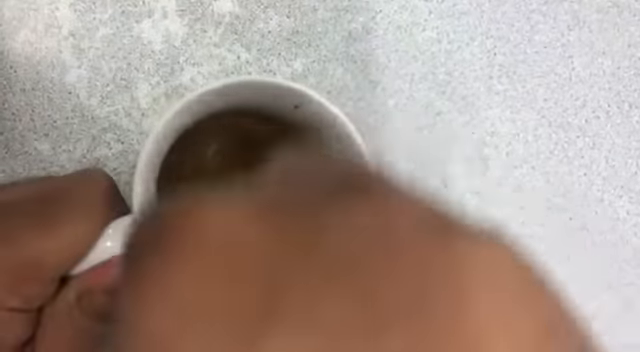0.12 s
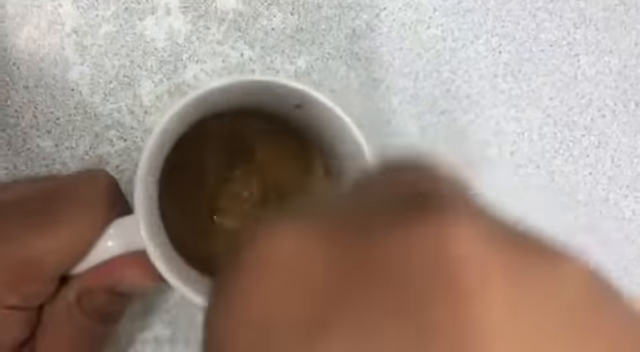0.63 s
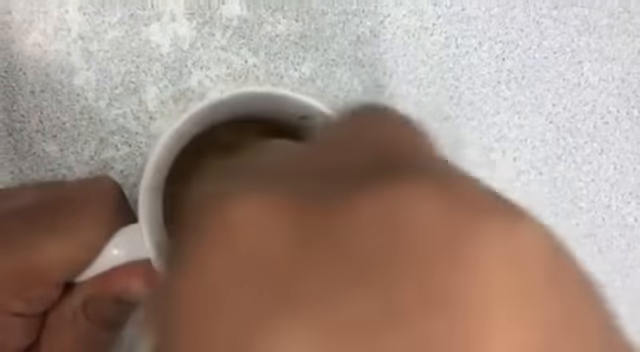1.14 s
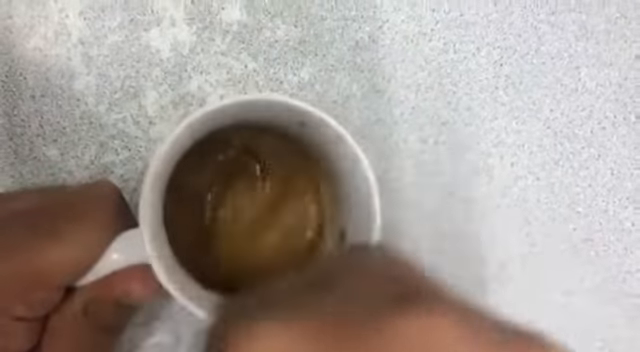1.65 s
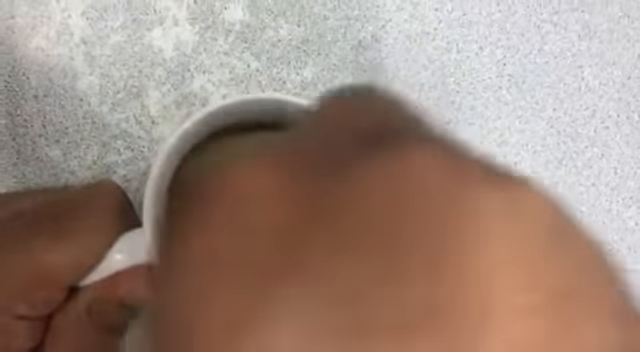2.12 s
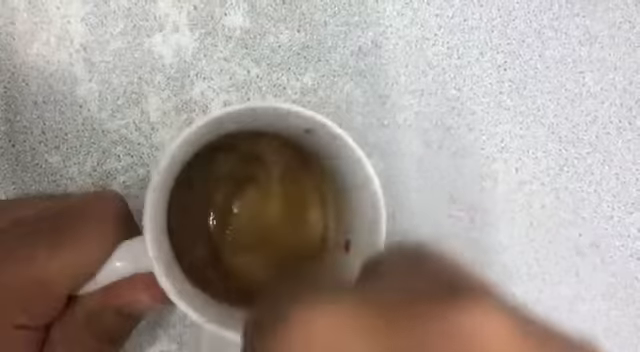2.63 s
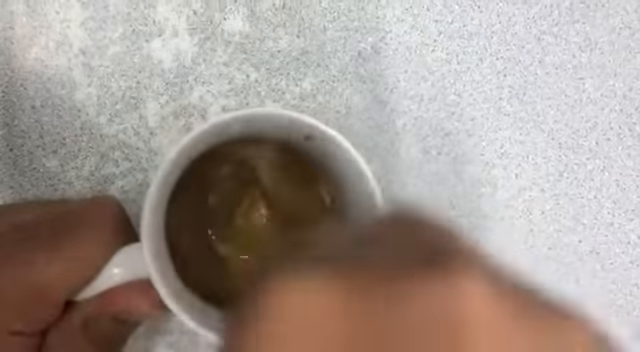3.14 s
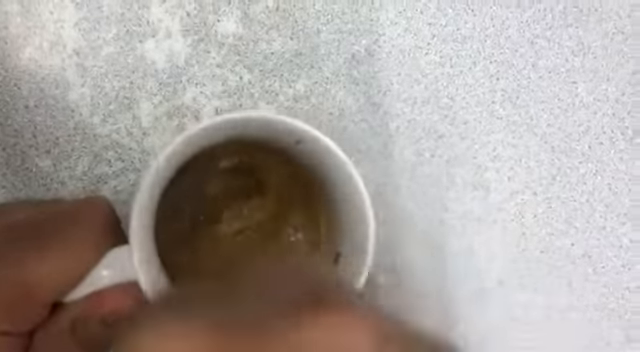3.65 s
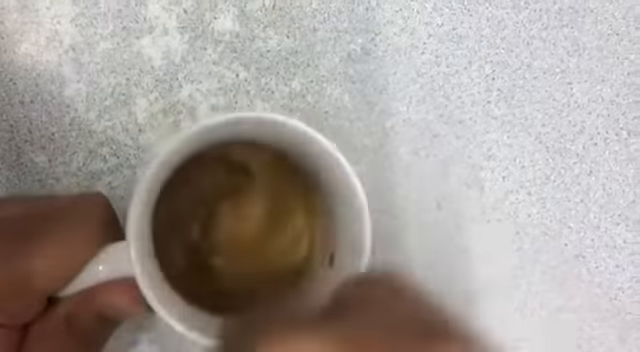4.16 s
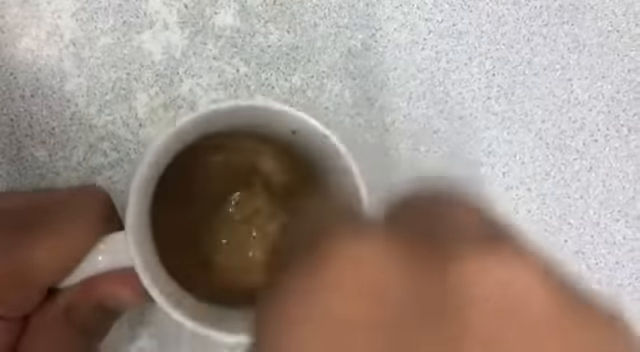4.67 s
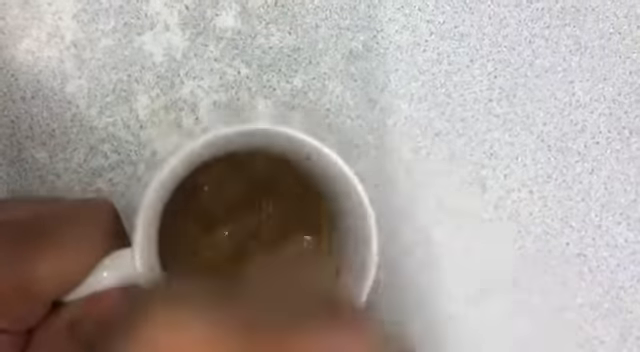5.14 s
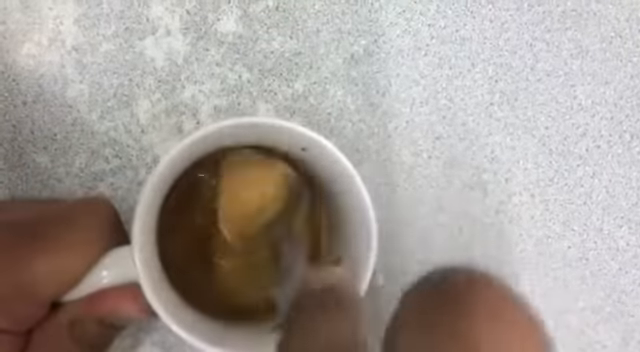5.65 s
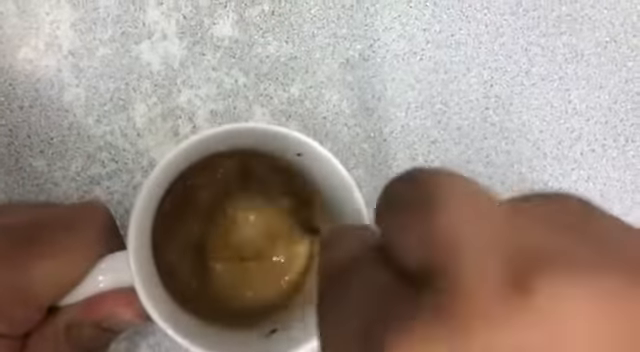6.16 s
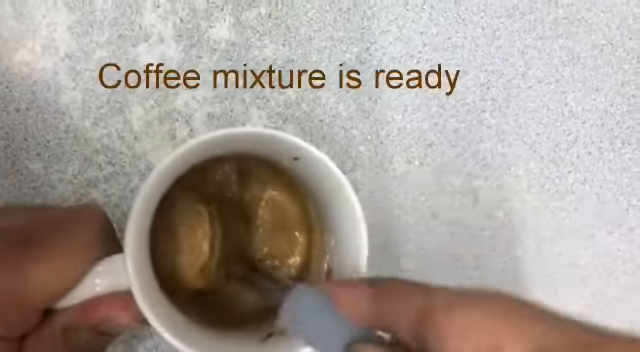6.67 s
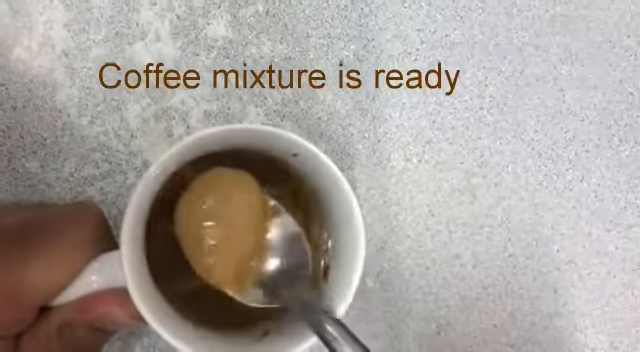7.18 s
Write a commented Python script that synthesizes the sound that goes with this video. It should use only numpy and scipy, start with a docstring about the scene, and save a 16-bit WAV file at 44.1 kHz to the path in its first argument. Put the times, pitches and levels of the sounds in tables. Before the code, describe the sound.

Close, rapid spoon stirring in a ceramic mug, hollow knocks, bright clinks and gritty wet scraping, ending in a pause and a few light touches.

```python
"""Kitchen counter, close by: a steel spoon beats thick coffee paste in a ceramic mug held down by hand.
Knocks ring damped modes of mug and spoon; the air column booms near 850 Hz. Random grains ring the same
modes as the spoon drags through paste, scrapes the wall and grates sugar. The beating stops, then the spoon
gathers the paste with a few light touches and slips. The walls answer over counter rumble and hiss."""
import sys
import numpy as np
from scipy import signal
from scipy.fft import rfft, irfft, next_fast_len
from scipy.io import wavfile
from scipy.ndimage import map_coordinates

SR = 44100
rng = np.random.default_rng(int(sys.argv[2]) if len(sys.argv) > 2 else 0)


def generate_wav(signal):
    """Clip the signal to [-1, 1] and save it as 16-bit WAV at the path in sys.argv[1]."""
    frames = np.transpose(np.atleast_2d(signal))
    scaled = np.clip(frames, -1, 1) * 32767
    pcm = np.round(scaled).astype(np.int16)
    wavfile.write(sys.argv[1], SR, pcm)


def how_loud(loudness_db):
    """Turn decibels into a plain amplitude multiplier (0 dB gives 1, 20 dB gives 10)."""
    steps = np.asarray(loudness_db, float) / 20
    return 10 ** steps


N = 321924

# spoon contacts: (time [s], boom of the air column [dB], clink of the wall [dB],
# edge [dB] that the top modes gain and the low wall modes lose, pitch of the mode that the spot rings most [Hz])
CONTACTS = [(0.0369, -40, -47.5, 2.5, 2990), (0.057, -44, -75, 2, 2900), (0.0645, -32.5, -40.5, -1, 4840),
            (0.116, -60.5, -44, 4, 6130), (0.135, -51, -56, 11.5, 2900), (0.1599, -34.5, -41, -1.5, 4280),
            (0.2483, -55.5, -54.5, -3, 2890), (0.2677, -53, -58.5, 0.5, 2900),
            (0.2862, -64.5, -56, -10, 2940), (0.3627, -36.5, -45.5, -3, 6210), (0.379, -44, -68.5, 6, 2900),
            (0.398, -39.5, -53.5, -1, 3450), (0.439, -43, -54.5, -1, 4200),
            (0.4765, -45.5, -49.5, 7.5, 6560), (0.481, -37.5, -39, -2, 6470),
            (0.5005, -43.5, -59.5, 7.5, 5720), (0.5553, -75, -53.5, 1, 2900), (0.669, -42, -47.5, 3, 4880),
            (0.756, -48.5, -49.5, -1, 4000), (0.798, -50, -59, 6.5, 8280), (0.8918, -49, -57.5, -9.5, 2700),
            (0.909, -39, -48, 1.5, 4120), (1.0144, -40.5, -45, -1.5, 4750), (1.0742, -52, -46, -2, 4250),
            (1.141, -48.5, -54.5, -3, 3680), (1.2386, -63, -46.5, -8.5, 2920),
            (1.3069, -39.5, -44, 4, 6290), (1.395, -47.5, -47, -3.5, 3120), (1.405, -38, -47.5, -5, 4500),
            (1.4531, -51.5, -55, -2.5, 7000), (1.628, -42.5, -44.5, 3.5, 9740),
            (1.653, -41.5, -51, 3.5, 7120), (1.7202, -35.5, -56.5, 2, 3100),
            (1.7374, -41.5, -40, 3.5, 4200), (1.9368, -37.5, -44.5, 3.5, 9650),
            (1.945, -52.5, -57, -5, 5100), (2.0541, -48, -57, 4, 10660), (2.0872, -52.5, -51.5, -3.5, 4530),
            (2.1638, -45.5, -54.5, -1, 2950), (2.1969, -74.5, -35, 2, 2960),
            (2.2655, -44.5, -53, -0.5, 2960), (2.28, -41, -60, 1, 4900), (2.3582, -53, -52, -3.5, 10700),
            (2.3635, -37.5, -52.5, -2, 4210), (2.4227, -40.5, -46.5, -1, 6500),
            (2.5091, -65, -58.5, -10, 2910), (2.5956, -49, -58.5, -0.5, 3010), (2.607, -41.5, -61, 0, 6240),
            (2.753, -50, -48, -2.5, 3430), (2.77, -41, -46, -5, 6550), (2.8168, -73, -48.5, -1.5, 4130),
            (2.9298, -37.5, -45, -1.5, 3020), (2.945, -47, -61.5, 11.5, 11050),
            (3.001, -50, -59.5, 7.5, 3100), (3.0341, -46, -60, -13.5, 4500), (3.1658, -76, -44, -1.5, 2900),
            (3.2417, -40, -45, 2, 10170), (3.316, -55, -55, -1, 6550), (3.322, -42.5, -54.5, -2.5, 3100),
            (3.3418, -46.5, -55.5, 4.5, 10140), (3.4086, -57, -57.5, -3, 2680),
            (3.467, -56.5, -37.5, 1.5, 2760), (3.534, -37.5, -48.5, -2.5, 2950),
            (3.543, -36, -65, 5.5, 330), (3.5714, -53.5, -54.5, 13, 6900), (3.6361, -48, -37, -0.5, 3120),
            (3.6991, -45.5, -61.5, -9, 2880), (3.8579, -39.5, -56.5, -3.5, 6210),
            (3.9255, -44, -52, -2, 4600), (3.9598, -44, -70, -9, 9440), (3.9701, -39.5, -42.5, 7.5, 10590),
            (3.9758, -35.5, -34, 0, 6540), (4.0733, -48.5, -48, -1.5, 3890), (4.1714, -37, -40, 5.5, 6820),
            (4.2773, -38, -51, -0.5, 3390), (4.291, -37, -48, -11.5, 4030),
            (4.3887, -65.5, -49.5, -4, 4130), (4.472, -43.5, -47.5, 1.5, 3660),
            (4.4968, -42, -65.5, 6.5, 9100), (4.575, -42.5, -66.5, -3.5, 2540),
            (4.5843, -53, -54.5, -9.5, 2900), (4.6031, -34, -36.5, 5.5, 6150),
            (4.671, -45.5, -64.5, -11, 2800), (4.6909, -77, -36.5, 0.5, 11440),
            (4.774, -40, -40.5, 2.5, 9040), (4.87, -44, -51, 0, 3040), (4.9238, -44.5, -39.5, 0.5, 6460),
            (5.087, -45, -52, 0.5, 2970), (5.109, -46, -56.5, 0, 6930), (5.1463, -35.5, -43.5, -0.5, 4700),
            (5.1902, -40, -45, -0.5, 7900), (5.2485, -41, -52, -3, 3420),
            (5.3225, -69.5, -48.5, -7.5, 2950), (6.0396, -58, -75, -1, 10200),
            (6.064, -48, -64.5, -6, 3000), (6.1754, -57.5, -60.5, -6, 2485),
            (6.256, -45, -63.5, -3.5, 2520), (6.2695, -52, -76.5, -17.5, 2340), (6.308, -54, -66, 7, 2800),
            (6.3196, -47, -61, -4, 4090), (6.8449, -58, -69, 0, 3100)]
# modes of mug and spoon, before each contact's own colour and damping: (pitch [Hz], level [dB], t60 [s])
MODES = [(296.3, -4, 0.029), (551, -9, 0.035), (840, 0, 0.1), (891.4, 8, 0.03), (1094, 1.5, 0.029),
         (1372, 0, 0.032), (1770, -23, 0.011), (2714, -6, 0.021), (3048, -5, 0.027), (3453, -8, 0.023),
         (4250, -6, 0.012), (5920, -12.5, 0.016), (6240, -11, 0.029), (8340, -8.5, 0.016), (9520, -9, 0.02),
         (10560, -10.5, 0.036)]
# borders of the four families of modes, air column, low wall, middle and top: [Hz]
BORDERS_HZ = [250, 1600, 3800, 7500, 13000]


def unit(x):
    """Scaled to rms 1."""
    return x / np.sqrt(np.mean(x ** 2) + 1e-20)


def along(points, hz):
    """Reads (Hz, value) points on a log frequency axis."""
    f, v = np.transpose(points)
    return np.interp(np.log(hz + 1), np.log(f + 1), v)


def curves(rows):
    """One value per sample for each column after the time."""
    s, *cols = np.transpose(rows)
    return [np.interp(np.arange(N) / SR, s, c) for c in cols]


def wobble(rate):
    """A smooth random curve, rate knots a second."""
    knots = rng.standard_normal(int(N * rate / SR) + 4)
    return map_coordinates(knots, [np.arange(N) * rate / SR])


def swell(middle, length):
    """A smooth rise and fall, 1 at its middle, spanning 1.5 lengths."""
    phase = (np.arange(N) / SR - middle) / (1.5 * length)
    return np.cos(np.pi * np.clip(phase, -.5, .5)) ** 2


def filtered(x, response):
    """x times a complex response of frequency."""
    m = next_fast_len(N + SR // 2)
    return irfft(rfft(x, m) * response(np.fft.rfftfreq(m, 1 / SR)), m)[..., :N]


def ringing(hz, db, t60):
    """Causal response of one damped mode."""
    width = np.log(1000) / np.pi / t60
    return lambda f: how_loud(db) * 1j * f * width / (hz * hz - f * f + 1j * f * width)


def family_of(hz):
    """Index of the family of modes that holds a frequency."""
    return np.searchsorted(BORDERS_HZ, hz) - 1


def grains(rate, spread_db):
    """Random tiny contacts, rate a second, a few much larger than the rest."""
    there = rng.random(N) < rate / SR
    return there * rng.standard_normal(N) * how_loud(spread_db * rng.exponential(size=N))


def favoured_db(s, hz):
    """Extra strength of the mode that the spoon excites most while it scoops up the wall."""
    # the scoop: (from [s], to [s], mode [Hz], extra level [dB])
    scoop = (6.4, 6.78, 2640, 11)
    start, end, mode_hz, extra_db = scoop
    return extra_db * (s > start) * (s < end) * (abs(hz / mode_hz - 1) < .06)


def slide(contact_db):
    """Power of the rubbing as the spoon slides on along the wall after each contact and dies away."""
    under_contact_db, t60_s = -14, 0.097
    power = np.zeros(N)
    starts = np.round(np.array(CONTACTS)[:, 0] * SR).astype(int)
    power[starts] = how_loud(contact_db + under_contact_db) ** 2
    return signal.lfilter([1], [1, -how_loud(-120 / t60_s / SR)], power)


def rubbing(level_db, family, rate, damping, rough_db, focus):
    """Dense wet grains ring some families; focus favours strong modes; each wavers as the spoon travels."""
    contact = grains(rate, spread_db=2.2) * how_loud(rough_db * wobble(70))
    s = np.arange(N) / SR
    rubbed = np.zeros(N)
    for hz, db, t60 in MODES:
        if family_of(hz) in family:
            travel = how_loud(3 * wobble(14) + favoured_db(s, hz))
            rubbed += filtered(contact * travel, ringing(hz, focus * db, t60 / damping))
    # wet contacts are too soft to reach far above their family
    top_hz = BORDERS_HZ[family[-1] + 1]
    return how_loud(level_db) * unit(filtered(rubbed, lambda f: (1 + 1j * f / top_hz) ** -2))


def stirring():
    """The spoon drags through the paste (air column), scrapes the wall (low modes), grates sugar (upper modes)."""
    # the stirring hand: (time [s], effort [dB])
    stir = [(0, -59.5), (5.28, -59), (5.4, -82), (6, -86), (6.07, -74.5), (6.35, -64.5), (6.42, -71),
            (6.6, -68), (6.78, -83), (6.9, -72.5), (7.05, -77), (7.2, -84), (7.3, -83)]
    # firm sweeps of the spoon: (middle [s], length [s], push through the paste [dB], scrape on the wall [dB])
    sweeps = [(0.131, 0.064, -41, -57.5), (0.275, 0.044, -64.5, -55), (0.513, 0.082, -45, -62.5),
              (0.597, 0.056, -96, -59), (0.76, 0.047, -49, -54.5), (1.12, 0.089, -49, -67),
              (1.418, 0.038, -42.5, -52), (1.56, 0.096, -58.5, -59), (1.828, 0.022, -46.5, -51.5),
              (1.863, 0.06, -56, -57), (2.062, 0.063, -48.5, -57.5), (2.424, 0.096, -55.5, -79),
              (2.532, 0.058, -73, -53), (2.695, 0.058, -55, -60), (2.774, 0.021, -46.5, -67),
              (3.01, 0.023, -44, -50), (3.343, 0.019, -46.5, -61), (3.568, 0.037, -47, -80.5),
              (3.672, 0.079, -50.5, -53.5), (3.784, 0.11, -63, -60.5), (4.406, 0.1, -62, -65),
              (4.602, 0.12, -56.5, -61.5), (4.912, 0.044, -41, -66), (5.003, 0.046, -56, -51.5),
              (5.186, .1, -52.5, -83), (5.297, 0.037, -48.5, -53.5), (6.186, 0.058, -61.5, -79),
              (6.522, 0.14, -62.5, -68), (6.692, 0.088, -72.5, -87)]
    # the spoon leaves the wall: (middle [s], length [s])
    lifts = [(0.257, 0.09), (0.837, 0.13), (1.002, 0.048), (1.187, .09), (1.544, 0.033), (2.16, 0.12),
             (2.605, 0.061), (2.874, 0.02), (3.098, 0.09), (3.418, 0.082), (3.892, 0.11), (4.37, 0.1),
             (5.098, 0.094), (5.133, 0.066)]
    beating_db, lift_db = -59, -11  # effort of steady beating; wall rubbing in mid-lift, relative
    wall_grows = 1.56  # rubbing on the wall swings wider than the effort
    effort_db, = curves(stir)
    _, boom_db, clink_db, edge_db, _ = np.transpose(CONTACTS)
    push = sum(how_loud(push_db) ** 2 * swell(middle, length) for middle, length, push_db, _ in sweeps)
    press = sum(how_loud(press_db) ** 2 * swell(middle, length) for middle, length, _, press_db in sweeps)
    lifted_db = lift_db * sum(swell(*row) for row in lifts)
    wall_db = beating_db + wall_grows * (effort_db - beating_db) + lifted_db
    stroke_db = .8 * wobble(18)  # shared by all three sounds

    def total(steady_db, power):
        """Steady rubbing, wavering, plus the power of sweeps and slides, in dB."""
        return 10 * np.log10(how_loud(steady_db + 2.2 * wobble(6.7)) ** 2 + power) + stroke_db

    drag_db = total(effort_db - 2.5, push + slide(boom_db))
    scrape_db = total(wall_db - 7, press + slide(clink_db - edge_db))
    paste_db = np.minimum(effort_db - beating_db, 0)  # slow gathering keeps the sugar wet and quiet
    sweep_grit = press * how_loud(-7.5 + paste_db) ** 2
    grit_db = total(wall_db - 4.5, sweep_grit + slide(clink_db + edge_db))
    drag = rubbing(drag_db, family=(0,), rate=1400, damping=1.6, rough_db=3.2, focus=1.3)
    scrape = rubbing(scrape_db, family=(1,), rate=2500, damping=1.3, rough_db=3.5, focus=.8)
    grit = rubbing(grit_db, family=(2, 3), rate=7500, damping=2.9, rough_db=3.5, focus=0.79)
    return drag + scrape + grit


def counter():
    """The beating hand shakes the counter under the microphone: low shaped noise that follows the hand."""
    # colour of the rumble carried through the counter: (frequency [Hz], relative density [dB])
    rumble_colour = [(35, 10.5), (57, 15.5), (110, 8), (300, -26)]
    # shaking of the counter: (time [s], level [dB])
    shake = [(0.0, -66.5), (5.33, -64), (5.47, -79), (7.3, -79)]
    noise = rng.standard_normal(N)
    rumble = unit(filtered(noise, lambda hz: how_loud(along(rumble_colour, hz))))
    return how_loud(curves(shake)[0]) * rumble


def air():
    """The quiet kitchen and microphone hiss: steady shaped noise."""
    # colour of the background: (frequency [Hz], relative density [dB])
    air_colour = [(24, -31), (40, -4.5), (162, -8), (228, -13.5), (312, -18), (12800, -39), (22000, -120)]
    noise = rng.standard_normal(N)
    return how_loud(-71) * unit(filtered(noise, lambda hz: how_loud(along(air_colour, hz))))


def kitchen(tracks):
    """Hard walls answer each track a little differently; each frequency dies at its own speed."""
    # life of the echo: (frequency [Hz], t60 [s])
    echo_life = [(300, 0.56), (3000, 0.18), (11000, 0.14)]
    noise = rng.standard_normal((len(tracks), SR // 2))
    hz, t, z = signal.stft(noise, SR, nperseg=256)
    decay = how_loud(-60 * t / along(echo_life, hz)[:, None])
    tails = signal.istft(z * decay, SR, nperseg=256)[1]
    tails /= np.linalg.norm(tails, axis=1, keepdims=True)
    later = np.pad(tracks, ((0, 0), (130, 0)))  # the walls answer after 3 ms
    return signal.fftconvolve(later, tails, axes=1)[:, :N].sum(0)


def knocks(count=6):
    """Each contact is a short rattle: a dry crack, and every mode rung anew; dealt out over count tracks."""
    middle_db = 2.5  # middle modes over the clink
    # the mode of the struck spot: extra strength, factor on its life, lift of its family
    spot_extra_db, spot_life, spot_family_db = 11, 0.8, 2.5
    hz, level, t60 = np.transpose(MODES)[:, :, None]
    t = np.arange(2048) / SR
    short, early = t[:512], SR // 200
    families = np.arange(len(BORDERS_HZ) - 1)[:, None]
    member = family_of(hz[:, 0]) == families
    band = family_of(np.fft.rfftfreq(len(t), 1 / SR)) == families
    # each family feels only the part of the force that is slow enough for it
    blunt = (1 + 1j * np.fft.rfftfreq(2 * len(t), 1 / SR) / np.array(BORDERS_HZ)[1:, None]) ** -2
    tracks = np.zeros((count, N + SR))
    for k, (s, boom_db, clink_db, edge_db, spot_hz) in enumerate(CONTACTS):
        strength_db = [boom_db, clink_db - edge_db, clink_db + middle_db, clink_db + edge_db]
        # the spot, the paste level and the grip change strength, pitch and damping from blow to blow
        strength_luck, pitch_luck, life_luck = rng.standard_normal((3, len(hz), 1))
        distance = abs(np.log(hz / spot_hz))
        spot = distance == distance.min()
        turn = 2 * np.pi * np.where(spot, spot_hz, hz * (1 + 0.016 * pitch_luck)) * t
        life = t60 * how_loud(1.5 * life_luck) * np.where(spot, spot_life, 1)
        # a blow cushioned by paste is duller, and its force builds and dies more slowly
        soft = how_loud(0.39 * np.clip(strength_db[0] - strength_db[2], 0, 25))
        struck = np.sqrt(soft) * level + 4.5 / np.sqrt(soft) * strength_luck + spot_extra_db * spot
        ring = member @ (how_loud(struck - 60 * t / life) * np.sin(turn))
        # the contact chatters: a noisy force that builds quickly, then dies
        swelling = (1 - np.exp(-short / (0.0003 * soft))) * how_loud(-60 * short / (0.0029 * soft))
        rattle = swelling * rng.standard_normal(len(short))
        force = rfft(rattle / np.linalg.norm(rattle), 2 * len(t)) * blunt
        ring = irfft(rfft(ring, 2 * len(t)) * force)[:, :len(t)]
        noise = irfft(rfft(rng.standard_normal(len(t))) * band)
        burst = (1 - np.exp(-t / (.0004 * soft))) ** 2 * how_loud(-60 * t / (.0075 * soft))
        crack = noise * burst * how_loud(np.array([[-8], [4], [13], [11]]))
        blow = ring + crack
        # the first 5 ms set the level of each family
        wanted = how_loud(np.array(strength_db)[:, None] + spot_family_db * (member @ spot))
        blow *= wanted / blow[:, :early].std(axis=1, keepdims=True)
        tracks[k % count, round(s * SR):][:len(t)] += blow.sum(0)
    # the knocks carry little below about 280 Hz
    return signal.sosfilt(signal.butter(4, 280, 'highpass', fs=SR, output='sos'), tracks[:, :N])


def touches_and_slips():
    """The tip touches the paste lightly and sticks and slips on the wet wall: soft shudders ring the modes."""
    # soft touches and slips while gathering: (time [s], boom of the air column [dB], ring of the wall [dB])
    soft_contacts = [(6.337, -57, -84), (6.4365, -69, -72), (6.4655, -53.5, -64), (6.4718, -54.5, -52.5),
                     (6.493, -68, -52), (6.506, -45.5, -49), (6.512, -74, -49), (6.5174, -51, -55),
                     (6.53, -60, -50), (6.5405, -61, -57), (6.5738, -65, -71), (6.5991, -60, -75),
                     (6.846, -57.5, -77), (6.851, -47, -64), (6.8996, -65.5, -87), (7.003, -59, -77.5),
                     (7.0958, -60.5, -83), (7.105, -66, -75.5), (7.131, -67, -86)]
    # what such a contact adds to each mode: (frequency [Hz], level [dB])
    contact_colour = [(400, -20), (830, 5), (1300, 0), (2640, 9), (3400, 3), (4200, -14), (5600, 4),
                      (6100, -25)]
    # with the paste scooped out the air column is longer: (from [s], pitch factor)
    deeper = (6.8, 0.97)
    sag, damping = 0.97, 1.1  # the pressed spoon lowers and damps the modes: factors
    force_t60_s = 0.008
    hz, level, t60 = np.transpose(MODES)[:, :, None]
    t = np.arange(1536) / SR
    wall, out = family_of(hz[:, 0]) > 0, np.zeros(N + SR)
    for s, boom_db, wall_db in soft_contacts:
        strength_luck, pitch_luck = rng.standard_normal((2, len(hz), 1))
        deepened = np.where(wall[:, None] | (s < deeper[0]), 1, deeper[1])
        rung = level + along(contact_colour, hz) + 3 * strength_luck - 60 * damping * t / t60
        pitch_hz = hz * sag * deepened * (1 + .015 * pitch_luck)
        modes = how_loud(rung) * (1 - np.exp(-t / .0008)) * np.sin(2 * np.pi * pitch_hz * t)
        shudder = (1 - np.exp(-t / .0015)) ** 2 * how_loud(-60 * t / force_t60_s)
        force = shudder * rng.standard_normal(len(t))
        for part, db in ((~wall, boom_db), (wall, wall_db)):
            ring = signal.fftconvolve(modes[part].sum(0), force)[:len(t)]
            # the first 8 ms set the level
            out[round(s * SR):][:len(t)] += how_loud(db) * ring / ring[:SR // 125].std()
    return out[:N]


def scene():
    """Knocks, stirring, touches and slips near the microphone, their echo, the counter and the background."""
    mug = np.vstack([knocks(), stirring(), touches_and_slips()])
    return (mug.sum(0) + how_loud(-12.5) * kitchen(mug) + counter() + air())[None]


def top_cut(x):
    """Nothing passes above the cut-off."""
    return signal.sosfilt(signal.butter(12, 12990, fs=SR, output="sos"), x)


def record(dry):
    """The microphone rolls off below 45 Hz and steeply near 12 kHz."""
    heard = filtered(dry, lambda hz: 1 / np.sqrt((1 + (hz / 11700) ** 90) * (1 + (45 / (hz + 1)) ** 6)))
    return top_cut(heard)


dry = scene()
out = record(dry)
generate_wav(out)
```